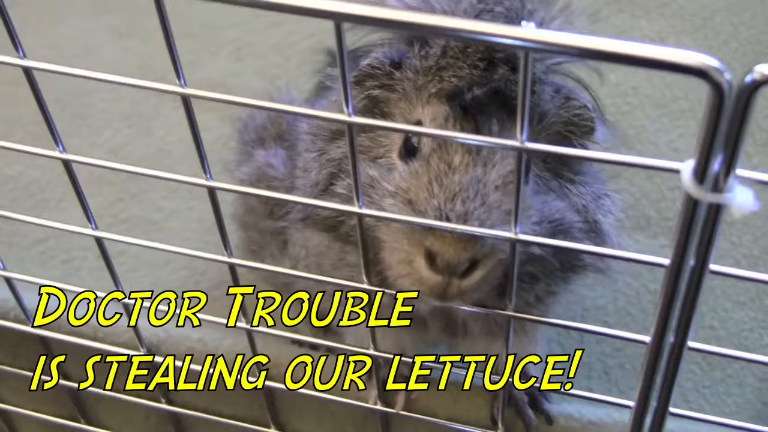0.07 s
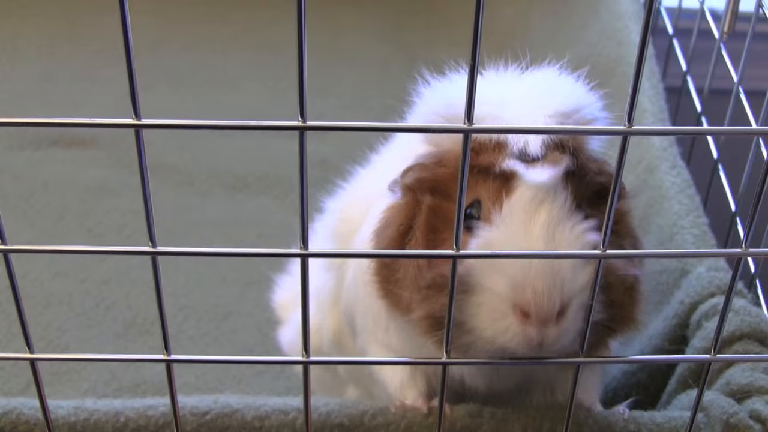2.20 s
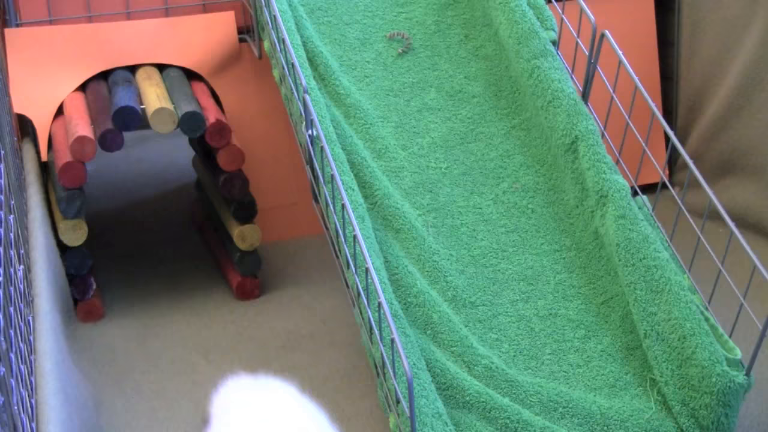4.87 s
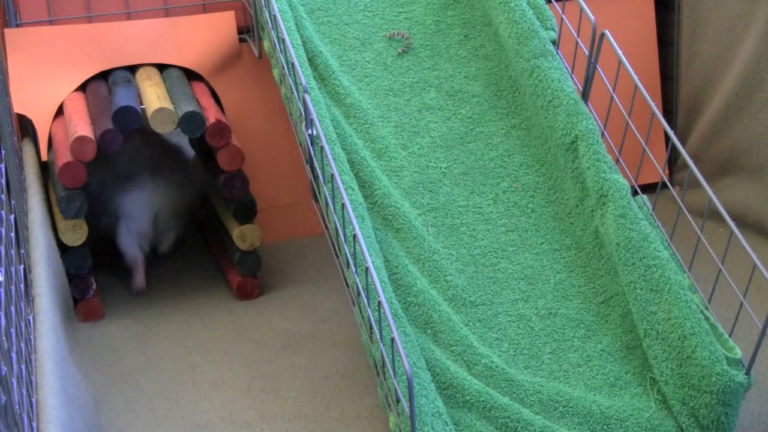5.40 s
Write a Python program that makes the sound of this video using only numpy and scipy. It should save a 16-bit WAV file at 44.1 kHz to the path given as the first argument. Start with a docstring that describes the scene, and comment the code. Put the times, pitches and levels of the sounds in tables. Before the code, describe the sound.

Three guinea pigs call in turn from their cages, heard from nearby in a small, slightly echoing room. Each squeal slides from a low buzz up to a whistle. The first animal is mellow, with a low hum underneath that stops when it does. The second is piercing and hoarse. After a few paw knocks and some scratching, the third squeaks briefly and softly over faint room air and a slight whine.

```python
"""Three guinea pigs wheek one after another in their wire cages, in a small room.
Each call is a source-filter sound: tightening vocal folds sweep from a low buzz up to a whistle,
the throat colours the overtones, and reverberation holds the last pitch. Paws excite the modes of
the cage floor, knocking and scrabbling mostly before and during the third animal's calls.
Behind them are brushing fur, room air, an appliance hum at first and a faint whine near the end."""
import sys
import numpy as np
from scipy import signal
from scipy.fft import rfft, irfft, next_fast_len
from scipy.io import wavfile
from scipy.ndimage import uniform_filter1d, minimum_filter1d

SR = 44100
rng = np.random.default_rng(int(sys.argv[2]) if len(sys.argv) > 2 else 0)


def master(y):
    """Save y as 16-bit WAV."""
    cut = np.clip(np.atleast_2d(y).T, -1, 1)
    pcm = np.round(cut * 32767)  # scale
    wavfile.write(sys.argv[1], SR, pcm.astype(np.int16))


N = 283122
TIME = np.arange(N) / SR

# Voice cracks on leaving the low note: t/s, half-width/s, added relative jitter, gain/dB
VOICE_CRACKS = [(1.178, 0.038, .03, -2), (1.62, 0.0198, 0.037, -6.5)]

def wheek(controls, rasp_db, throat, jitter, steadying, slope_db, even_db, rasp_fall_db):
    """Source-filter model: a fundamental, plus overtones and breath noise shaped by the throat."""
    t, hz, level_db, bright_db = controls
    # slack folds beat unevenly in rate and strength; they steady as they tighten
    hoarse = jitter * (hz.min() / hz) ** steadying
    for s, half, extra, db in VOICE_CRACKS:
        crack = np.exp(-((t - s) / half) ** 2)
        hoarse, level_db = hoarse + extra * crack, level_db + db * crack
    phase = 2 * np.pi * np.cumsum(hz * (1 + hoarse * wander(len(t), 280))) / SR
    shimmer = gain_of(50 * hoarse * wander(len(t), 150))
    k = np.arange(2, 23)[:, None]  # harmonic numbers
    weight = gain_of(read(throat, k * hz) - slope_db * np.log2(k) + even_db * (k % 2 == 0))
    weight *= k * hz < SR / 2
    weight *= gain_of(2.5 * np.array([wander(len(t), 45) for _ in k]))  # each flutters on its own
    overtones = (weight * np.cos(k * phase)).sum(0) / np.sqrt((weight ** 2).sum(0) + 1e-20)
    # air escapes in one puff a cycle; the small throat passes no bass
    puffs = rng.standard_normal(len(t)) * (1 + np.cos(phase))
    puffs = signal.sosfilt(signal.butter(2, 650, "high", fs=SR, output="sos"), puffs)
    rasp = coloured(puffs, throat) * gain_of(rasp_db - rasp_fall_db * np.log2(hz / hz.min()))
    voice = np.sqrt(2) * shimmer * (np.sin(phase) + gain_of(bright_db) * overtones) + rasp
    edges = np.clip(np.minimum((t - t[0]) / .003, (t[-1] - t) / .007), 0, 1)  # attack and release
    return t[0], gain_of(level_db) * voice * edges


def glide(call, register, uneven, sag_s=.0072, flutter_db=1.7, flutter_hz=45):
    """Tension sets pitch: a drifting low note rises along an S-curve to a whistle, which may sag."""
    start, length, sweep_at, sweep_s, low_hz, top_hz, drift, sag = call[:8]
    *effort_db, bright_low_db, bright_top_db = call[8:]
    t = np.arange(0, length, 1 / SR)
    tension = 1 / (1 + np.exp(-(t - sweep_at) / sweep_s))
    hz = (low_hz * 2 ** (drift * t)) ** (1 - tension) * top_hz ** tension
    climb = np.log(hz / hz.min()) / np.log(hz.max() / hz.min())
    wobble = uneven * np.sin(np.pi * tension) * wander(len(t), flutter_hz)
    hz = hz * (1 + wobble - sag * np.exp((t - length) / sag_s))
    register = np.array(register)
    level_db = np.interp(climb, [0, .6, 1], effort_db) + read(register[:, [0, 1]], hz)
    level_db += flutter_db * np.sqrt(tension) * wander(len(t), flutter_hz)
    bright_db = bright_low_db + (bright_top_db - bright_low_db) * climb + read(register[:, [0, 2]], hz)
    return start + t, hz, level_db, bright_db


# The first animal's opening note: t/s, f/Hz, level/dB, overtones re fundamental/dB
OPENING_NOTE = [(0.0, 1003, -9.5, -24.5), (0.045, 927, -11.5, -19), (0.08, 1005, -9, -17.5),
                (0.105, 975, -8.5, -15.5), (0.138, 1046, -10, -17), (0.174, 991, -10.5, -18),
                (0.243, 1163, -10, -14.5), (0.266, 1167, -9.5, -14), (0.283, 1355, -11.5, -19),
                (0.302, 1360, -12.5, -15), (0.314, 1803, -22.5, -7.5), (0.329, 2050, -9.5, -19)]

def held_note():
    """Frequency modulation: the pitch and level contours of a note that quavers, then flicks up."""
    s, pitch, level, bright = np.transpose(OPENING_NOTE)
    t = np.arange(s[0], s[-1], 1 / SR)
    hz = np.exp(uniform_filter1d(np.interp(t, s, np.log(pitch)), size=400, mode="nearest"))
    return t, hz, np.interp(t, s, level), np.interp(t, s, bright)


def animal(calls, register, throat, uneven, opening=(), **voice):
    """Directivity: the more an animal turns away, the more of a call's power arrives as reverberation."""
    glides = [(glide(call, register, uneven), rasp_db, room_db) for *call, rasp_db, room_db in calls]
    direct, sent = np.zeros((2, N))
    for controls, rasp_db, room_db in [*opening, *glides]:
        s, sound = wheek(controls, rasp_db, throat, **voice)
        sound = sound / np.hypot(1, gain_of(room_db))
        add(direct, s, sound)
        add(sent, s, sound * gain_of(room_db))
    return direct + room(sent)


# Calls: t/s, length/s, sweep centre after onset/s, sweep time constant/s, low f/Hz, target f/Hz,
# drift/(octave/s), relative sag, effort/dB (low, mid-sweep, top), overtones/dB (low, top),
# rasp/dB, room re direct/dB
MELLOW_WHEEKS = [(0.446, 0.208, 0.178, 0.014, 562.6, 2284, 4.5, 0.0058, -25.5, -11, -24.5, -9, -13.5, -35.5, -15),
                 (0.768, 0.21, 0.14, 0.029, 645.7, 3233, -0.5, 0.0027, -22.5, -8, -24, -10.5, -21, -35, -17.5),
                 (1.085, 0.33, 0.18, 0.029, 622, 3213, 1.36, 0.19, -24.5, -13.5, -24.5, -12, -17, -37.5, -13),
                 (1.519, 0.285, 0.15, 0.04, 648, 3643, -1.15, 0.057, -20.5, -16, -25, -12.5, -16, -43.5, -12)]
SHRILL_WHEEKS = [(2.962, 0.194, 0.028, 0.035, 405.6, 4040, 14, 0.11, -46, -27, -9, 3, -6.5, -5, -8.5),
                 (3.271, 0.29, 0.096, 0.031, 670.5, 4048, -14, 0.12, -22.5, -26, -18, -15, 5.5, -11, -11),
                 (3.658, 0.248, 0.111, 0.0284, 728, 3716, -9.5, 0.038, -25, -30.5, -26, -6.5, -9, -2.5, -10.5),
                 (4.036, 0.23, 0.1, 0.034, 695, 3937, -15, 0, -25.5, -24.5, -51, -10.5, -20, -19, -13)]
THIRD_WHEEKS = [(5.018, 0.096, 0.074, 0.0077, 749, 1292, 6, 0.00061, -37.5, -34, -37.5, -12.5, -20, -13, -14.5),
                (5.286, 0.18, 0.155, 0.009, 805, 3440, 9, 0.0022, -36, -28, -37, -11.5, -18.5, -24, -12.5),
                (5.665, 0.1406, 0.102, 0.025, 700, 5520, -2.5, 0, -34.5, -41, -39.5, -12, -15.5, -4, -5),
                (5.876, 0.14, 0.098, 0.019, 748, 4230, 7.5, 0, -36, -42, -45, -13.5, -11, -4.5, -5),
                (6.092, 0.094, 0.066, 0.01, 935, 2990, 0, 0.0031, -41, -47.5, -40.5, -10, -26, -19, -5.5),
                (6.279, 0.05, 0.031, 0.0035, 923, 980, -5, 0.0043, -42, -46, -49, -17, -12, -8, -1)]
# Registers, how a voice carries at each pitch: f/Hz, gain/dB, overtones re fundamental/dB
MELLOW_RANGE = [(635, -0.5, 11), (694, -0.5, 5.5), (900, 0.5, -4), (1250, -0.5, -8), (1800, -7, 0),
                (2050, -1, -10.5), (2860, 6, -1), (3200, 3, -0.5)]
SHRILL_RANGE = [(620, -10.5, 5), (1050, 0.5, -9), (1340, -11, -2.5), (2020, 4, -10), (2700, 6, 0),
                (3160, 0, 7), (3600, 1, -0.5), (3950, 1.5, 4)]
THIRD_RANGE = [(773, -5.5, 5.5), (1090, -0.5, -2.5), (1450, 4, -1.5), (1993, -3, -1.5), (2700, -1.5, -3.5),
               (3600, 3.5, -4)]
# Throat responses, the first two deeply notched near 4.5 kHz: f/Hz, gain/dB
MELLOW_TRACT = [(1250, 7), (1950, -13.5), (2700, 1.5), (3400, -8.5), (4000, -11.5), (4500, -25.5),
                (5400, -17.5), (7200, -4), (9000, -17), (12500, -6), (14000, -28)]
SHRILL_TRACT = [(1250, 8), (2200, 8.5), (3600, 1), (4500, -25.5), (5500, -10.5), (7600, -2.5), (8400, -4),
                (9700, 1.5), (11800, -29.5), (12700, -13), (15000, -38.5)]
THIRD_TRACT = [(1500, 16), (3000, 3), (4800, 0.5), (7000, -18), (9500, -7), (15000, -29)]

def guinea_pigs():
    """Timbre: formants, jitter and spectral slope (dB per octave) set the three voices apart."""
    opening = [(held_note(), -34.5, -20)]  # contours, rasp/dB, room/dB
    mellow = animal(MELLOW_WHEEKS, MELLOW_RANGE, MELLOW_TRACT, uneven=.017, opening=opening,
                    jitter=.007, steadying=1.5, slope_db=13, even_db=-5, rasp_fall_db=-.5)
    shrill = animal(SHRILL_WHEEKS, SHRILL_RANGE, SHRILL_TRACT, uneven=.024,
                    jitter=.07, steadying=1.7, slope_db=5.5, even_db=-.5, rasp_fall_db=15.5)
    third = animal(THIRD_WHEEKS, THIRD_RANGE, THIRD_TRACT, uneven=.035,
                   jitter=.045, steadying=.5, slope_db=2.5, even_db=2, rasp_fall_db=6)
    return mellow, shrill, third


# Blows of paws and body: t/s, peak level/dB, upper cutoff f/Hz (higher is harder)
PAW_BLOWS = [(1.166, -48, 1540), (1.37, -30.5, 500), (1.595, -25, 969.4), (3.733, -33, 500),
             (4.664, -35.5, 697), (4.729, -27.5, 697), (4.751, -29, 4010), (4.775, -29, 700),
             (4.89, -24.5, 1172), (5.564, -33.5, 3042), (5.595, -33.5, 7060), (5.64, -29, 2500),
             (5.819, -32, 900)]
# Modes of the cage floor: f/Hz, bandwidth/Hz, level/dB
FLOOR_MODES = [(378.6, 51, -3), (500, 310, 12.5), (900, 210, 3.5), (1550, 240, 3), (2600, 1400, -22.5)]
# Envelope of the scrabbling: t/s, level/dB
CLAW_LEVEL = [(4.55, -63.5), (4.7, -59.5), (4.78, -47.5), (4.86, -61.5), (5.2, -47.5), (5.9, -66),
              (6.15, -58)]

def cage(rattle=.2, rattle_s=.011, clump_db=5, room_db=-8):
    """Impact excitation: rattling blows ring the floor's damped modes; claws add clumps of noise."""
    t = np.arange(SR // 8) / SR
    floor = sum(gain_of(db) * np.exp(-np.pi * width * t) * np.cos(2 * np.pi * hz * t)
                for hz, width, db in FLOOR_MODES)
    paws = np.zeros(N)
    for s, db, hard_hz in PAW_BLOWS:
        blow = (t == 0) + rattle * rng.standard_normal(len(t)) * np.exp(-t / rattle_s)
        blow = signal.sosfilt(signal.butter(1, [150, hard_hz], "band", fs=SR, output="sos"), blow)
        knock = signal.fftconvolve(blow, floor)
        add(paws, s, gain_of(db) * knock / abs(knock).max())
    taps = rng.standard_normal(N) * gain_of(clump_db * wander(N, 48))
    claws = coloured(taps, [(60, -42.5), (170, 1.5), (500, -.5), (1600, 0), (5000, -21.5), (15000, -29.5)])
    paws += claws * gain_of(curve(CLAW_LEVEL)) * (TIME > CLAW_LEVEL[0][0])
    return paws + gain_of(room_db) * room(paws)


# Brushes of fur: t/s, half-width/s, level/dB, centre f/Hz
FUR_STROKES = [(0.162, .04, -42.5, 9585), (3.737, 0.018, -39.5, 9300)]

def fur(octaves=.3):
    """Friction noise: fur sliding past bedding and wire gives short swells of high hiss."""
    hz = np.fft.rfftfreq(N, 1 / SR) + 1
    noise = rfft(rng.standard_normal(N))
    strokes = np.zeros(N)
    for s, half, db, centre in FUR_STROKES:
        hiss = unit_rms(irfft(noise * np.exp(-(np.log2(hz / centre) / octaves) ** 2), N))
        strokes += gain_of(db) * np.exp(-((TIME - s) / half) ** 2) * hiss
    return strokes


# Reverberation time: f/Hz, T60/s
DECAY_TIMES = [(300, 0.84), (1300, 0.57), (3600, 0.43), (8000, 0.3), (15000, 0.14)]
# Width of the echoes: f/Hz, side-to-mid amplitude ratio
ECHO_WIDTH = [(500, .25), (1300, .35), (3600, .5), (9000, 0.28)]

def room(x, early_db=15, early_s=.03):
    """Reverberation: dense early echoes from the pen, then a tail in which each band has its own decay."""
    t = np.arange(SR // 2) / SR
    echoes = rng.standard_normal((2, len(t))) * (t > .0015)
    echoes *= 1 + gain_of(early_db) * np.exp(-t / early_s)
    hz, at, bands = signal.stft(echoes, SR, nperseg=256)
    bands *= gain_of(-60 * at / read(DECAY_TIMES, hz)[:, None])
    bands[1] *= read(ECHO_WIDTH, hz)[:, None]
    mid, side = signal.istft(bands, SR, nperseg=256)[1]
    tail = np.array([mid + side, mid - side])
    return signal.fftconvolve(x[None], tail / np.linalg.norm(tail[0]), axes=1)[:, :N]


# Partials of the hum: f/Hz, level/dB
HUM_TONES = [(98.7, -52), (196, -52.5), (208, -48.5), (253.5, -44)]
# Spectrum of the air under the hum: f/Hz, relative level/dB
RUSH_SPECTRUM = [(65, -25), (95, -4), (170, -4), (300, 1), (450, -5.5), (2500, -14.5), (5000, -27.5),
                 (14000, -36)]
# Swell of that air: t/s, gain/dB
RUSH_SWELL = [(0.1, 4.5), (.9, 1), (1.3, 4), (1.7, 3.5)]

def hum(air_db=-45, waver=.32):
    """Amplitude and phase modulation: an appliance's tones waver slowly over a rush of air."""
    tones = np.zeros((2, N))
    for hz, db in HUM_TONES:
        amplitude = gain_of(db) * np.sqrt(2) * (1 + waver * wander(N, 3.1))
        ear_phase = np.array([[0], [(hz / 220) ** 3]])  # higher tones reach the ears out of step
        tones += amplitude * np.sin(2 * np.pi * hz * TIME + .4 * wander(N, 3.6) + ear_phase)
    return tones + gain_of(air_db + curve(RUSH_SWELL)) * diffuse_noise(RUSH_SPECTRUM)


# Bands of the whine: centre f/Hz, relative level/dB
WHINE_BANDS = [(3700, 8.5), (5950, 2.5), (9080, -2), (10750, -25), (12900, -10), (14000, -8)]

def whine(level_db=-56, width_hz=130, hiss_db=-15, waver_db=3, start_s=5):
    """Narrow-band noise: fuzzy high pitches waver in a soft hiss behind the third animal."""
    hz = np.fft.rfftfreq(N, 1 / SR)
    peaks = sum(gain_of(db) / (1 + ((hz - centre) / width_hz) ** 2) for centre, db in WHINE_BANDS)
    bands = unit_rms(irfft(rfft(rng.standard_normal((2, N))) * (gain_of(hiss_db) + peaks), N))
    return bands * gain_of(level_db + waver_db * wander(N, 16.5)) * np.clip((TIME - start_s) * 20, 0, 1)


# Spectrum of the room's air: f/Hz, relative level/dB
AMBIENT_SPECTRUM = [(40, -30), (130, -9.5), (310, -2.5), (500, -7), (1300, -10.5), (3000, -20.5),
                    (6000, -28.5), (15000, -38)]
# Swell of that air: t/s, gain/dB
AMBIENT_SWELL = [(2.9, -2), (3.05, 8.5), (4.15, 7.5), (4.3, -4.5), (5.1, 3)]

def room_air(level_db=-56.5):
    """Ambient noise: a faint broadband rush that swells while the second animal calls."""
    return gain_of(level_db + curve(AMBIENT_SWELL)) * diffuse_noise(AMBIENT_SPECTRUM)


# Likeness of the noise at the two ears: f/Hz, correlation
EAR_CORRELATION = [(100, 0.89), (280, 0.55), (600, 0.3), (3000, 0.17), (12000, 0.27)]

def diffuse_noise(spectrum):
    """Partial coherence: the two ears share most of the bass of a steady noise and little of its treble."""
    hz = np.fft.rfftfreq(N, 1 / SR)
    left, other = rfft(rng.standard_normal((2, N)))
    shared = read(EAR_CORRELATION, hz)
    right = shared * left + np.sqrt(1 - shared ** 2) * other
    return unit_rms(irfft(np.array([left, right]) * gain_of(read(spectrum, hz)), N))


def gain_of(db):
    """Decibels to amplitude ratio."""
    return 10 ** (np.asarray(db) / 20)


def unit_rms(x):
    """Normalisation to rms 1."""
    return x / np.sqrt(np.mean(x ** 2) + 1e-20)


def read(points, hz):
    """Interpolation on a log-frequency axis."""
    f, value = np.transpose(points)
    return np.interp(np.log(hz + 1), np.log(f + 1), value)


def curve(points):
    """Interpolation of a time curve at every sample."""
    return np.interp(TIME, *np.transpose(points))


def add(mix, s, sound):
    """Superposition of a sound on the mix at time s."""
    part = mix[max(round(s * SR), 0):][:len(sound)]
    part += sound[:len(part)]


def coloured(x, spectrum):
    """Spectral filtering of x, at rms 1."""
    size = next_fast_len(len(x))
    response = gain_of(read(spectrum, np.fft.rfftfreq(size, 1 / SR)))
    return unit_rms(irfft(rfft(x, size) * response, size)[:len(x)])


def wander(size, rate_hz):
    """Random modulation: noise of rms about 1, low-passed at rate_hz."""
    hz = np.fft.rfftfreq(2 ** 19 if size > SR else 2 ** 15, 1 / SR)
    noise = rfft(rng.standard_normal(2 * len(hz) - 2))
    return unit_rms(irfft(noise * np.exp(-(hz / rate_hz) ** 2)))[:size]


def scene():
    """Superposition of animals, cage and background; the hum fades out with the first animal."""
    mellow, shrill, third = guinea_pigs()
    first = (mellow + hum()) * curve([(1.84, 1), (1.92, .014)])
    return first + shrill + third + cage() + fur() + whine() + room_air()


# All sound fades out and in again: centre t/s, half-length/s
LEVEL_DIPS = [(2.269, 0.051), (4.478, 0.072), (4.956, 0.056)]

def record(dry, lag_s=.000012, ceiling=.93, edge_hz=15750):
    """Arrival-time difference: the left channel lags; then three brief dips, limiting and a low-pass."""
    delay = np.exp(-2j * np.pi * np.fft.rfftfreq(N, 1 / SR) * lag_s)
    left = irfft(rfft(dry[0]) * delay, N)
    dips = np.prod([np.clip(abs(TIME - s) / half, .03, 1) for s, half in LEVEL_DIPS], axis=0)
    stereo = np.array([left, dry[1]]) * dips
    # the limiter eases the gain down around the peaks of the loudest whistles
    allowed = 1 / np.maximum(abs(stereo).max(0) / ceiling, 1)
    stereo *= uniform_filter1d(minimum_filter1d(allowed, size=200), size=200)
    low_pass = signal.firwin(511, edge_hz, window=("kaiser", 9), fs=SR)
    return signal.oaconvolve(stereo, low_pass[None], "same")


dry = scene()
out = record(dry)
master(out)
```